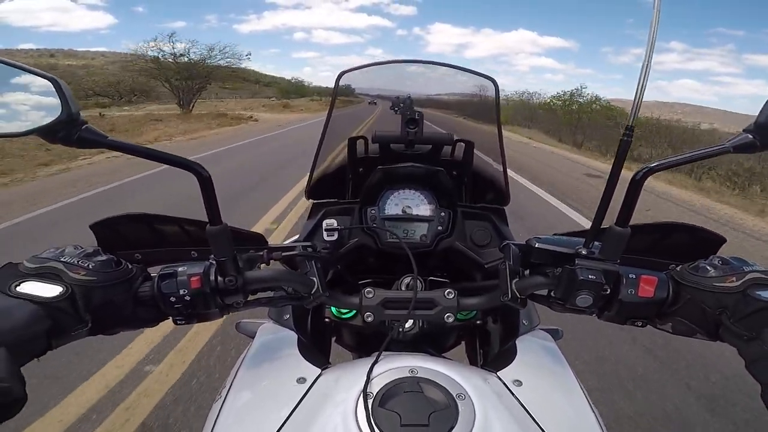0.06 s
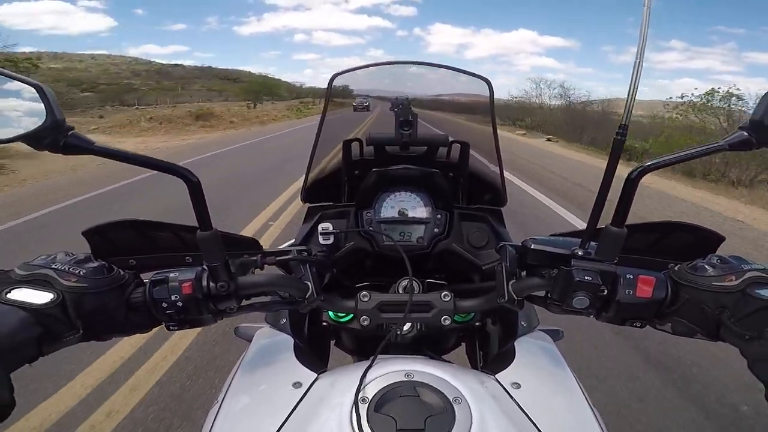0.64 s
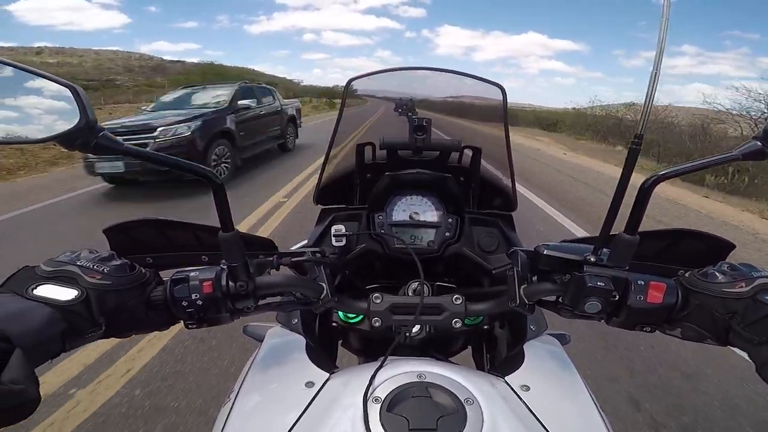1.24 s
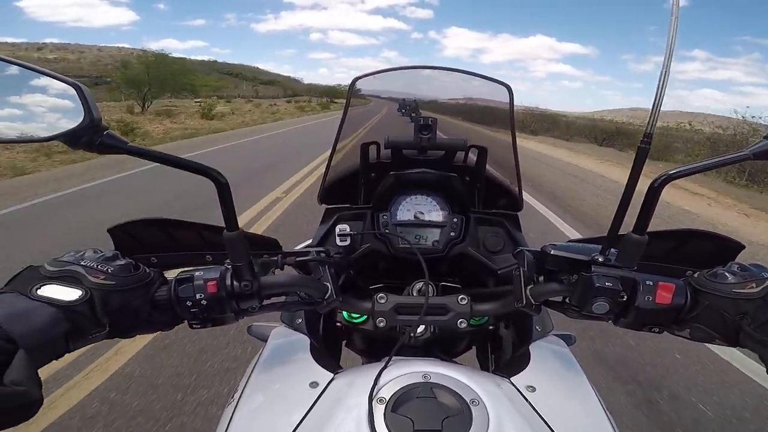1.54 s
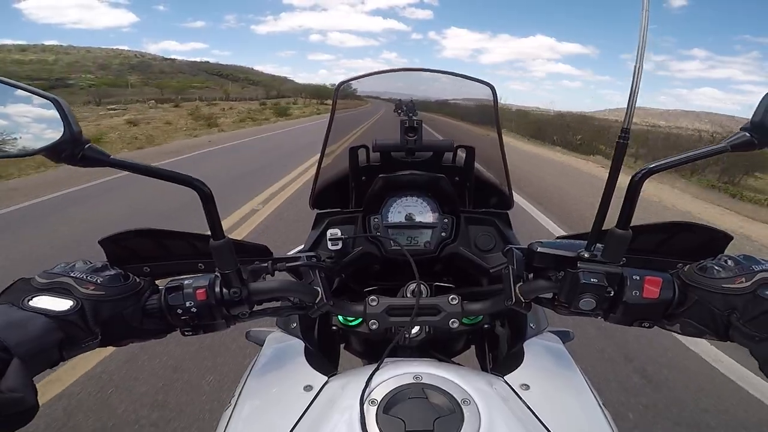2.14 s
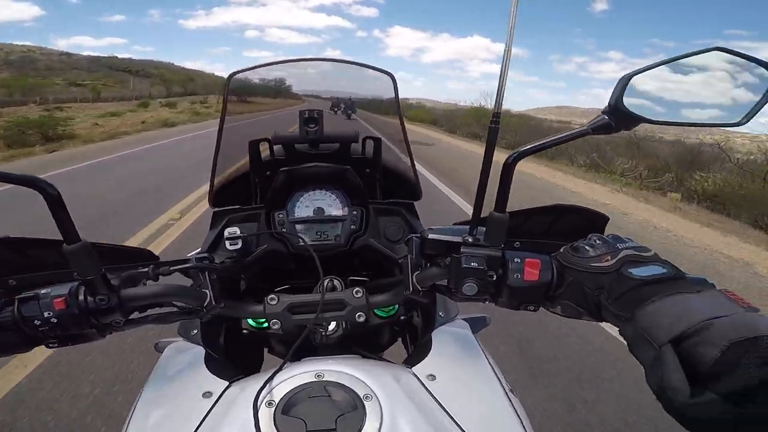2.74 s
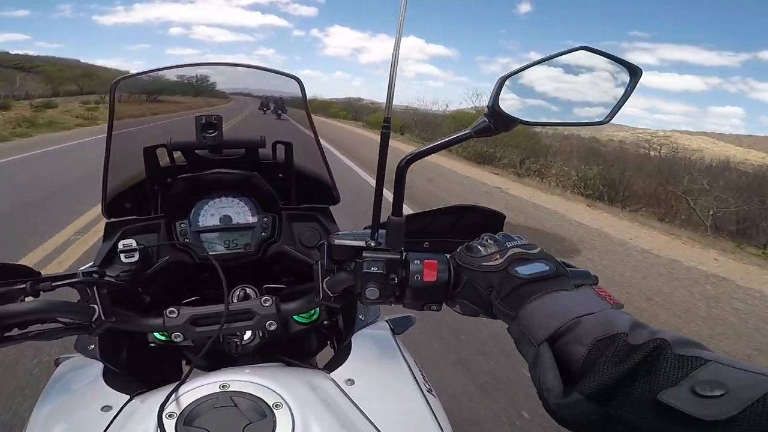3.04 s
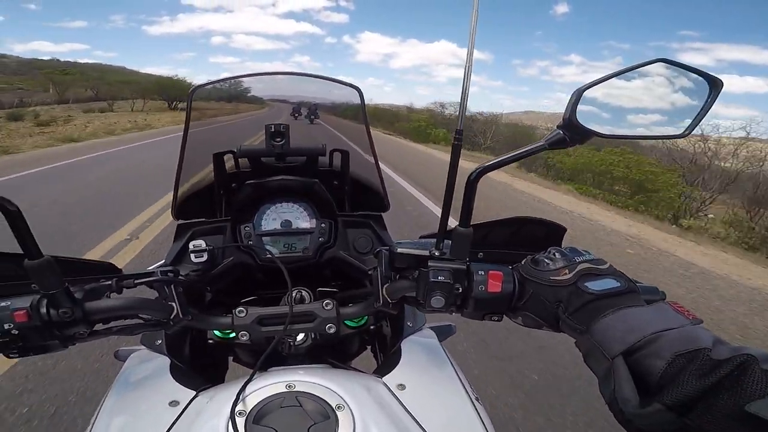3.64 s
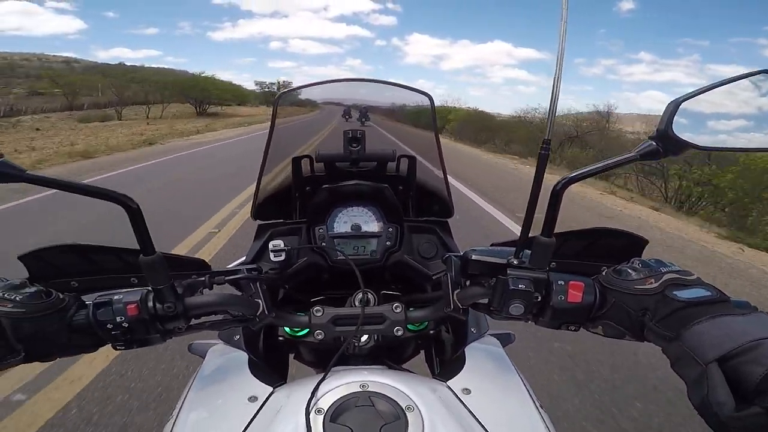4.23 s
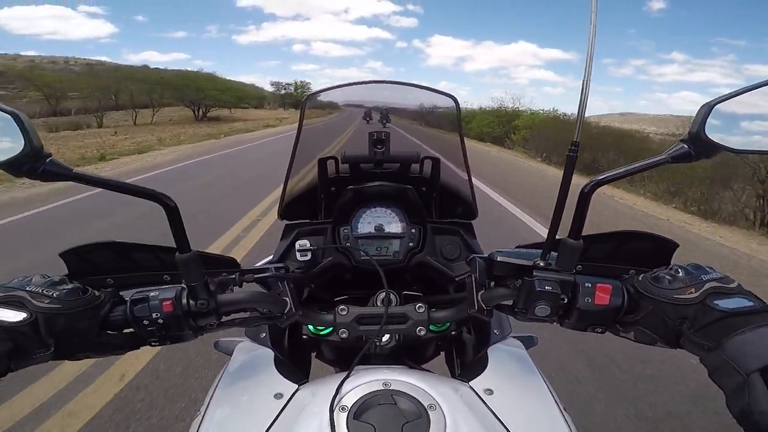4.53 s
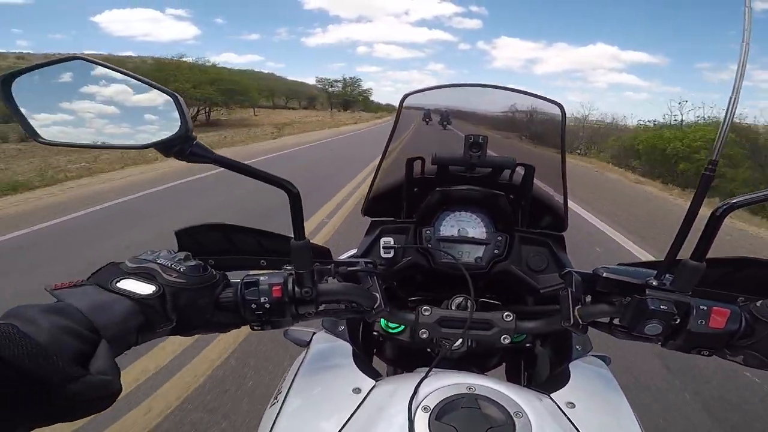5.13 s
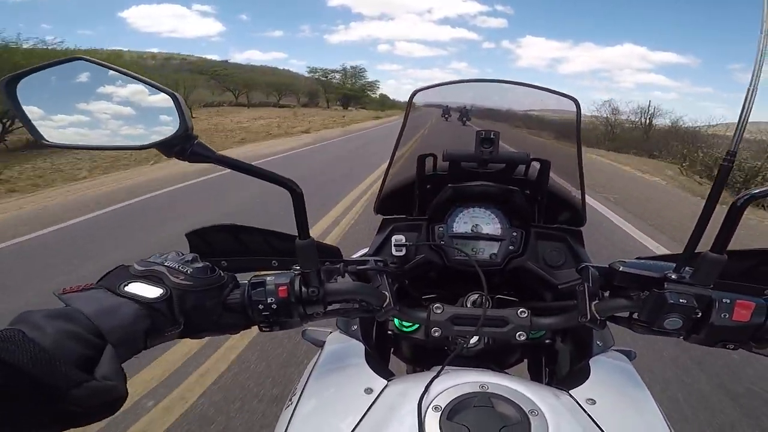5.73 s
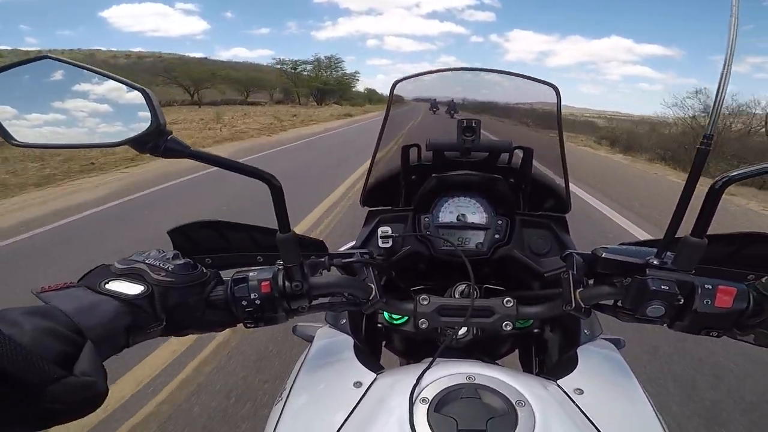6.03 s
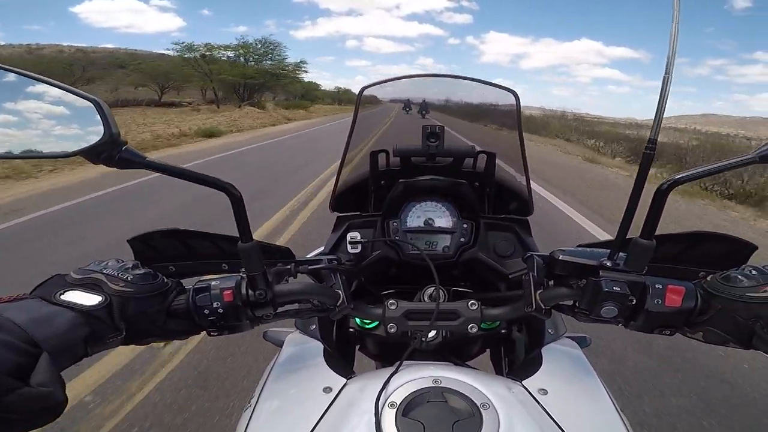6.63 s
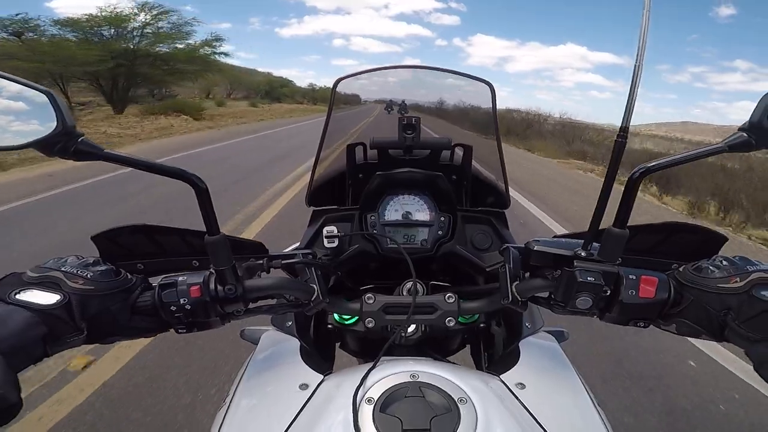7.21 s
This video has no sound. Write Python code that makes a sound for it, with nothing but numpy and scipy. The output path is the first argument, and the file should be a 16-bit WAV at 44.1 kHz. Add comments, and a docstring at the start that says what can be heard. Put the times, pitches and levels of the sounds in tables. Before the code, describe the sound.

A motorcycle rides at an even speed on an open road, heard from the rider's helmet, where low, gusty wind buffeting dominates. The engine's hum and light whine sit underneath, growing slightly stronger later. After about a second a pickup whooshes by in the opposite direction with a very short whistle. Soft thuds, sharp slaps of air and a few brief overloading pops hit the microphone along the way.

```python
"""Turbulent wind buffets a microphone on the helmet of a cruising motorcyclist: eddies roar, hiss, thump
and slap, and now and then a blast pins the diaphragm. Beneath it the exhaust hums, intake gulps drone
in the airbox, the gears whine, the chain rings and the valves tick. A pickup rushes past the other way
with tyre roar and a brief whistle, and the riding gear rustles a few times."""
import sys
import numpy as np
from scipy import signal
from scipy.fft import rfft, irfft
from scipy.io import wavfile
from scipy.ndimage import uniform_filter1d

SR = 44100
rng = np.random.default_rng(int(sys.argv[2]) if len(sys.argv) > 2 else 0)


def wrap_up_sound(samples):
    """Save the sound to the file named by the first command line argument, as 16-bit audio."""
    columns = np.atleast_2d(samples).T
    # keep every value between -1 and 1, then stretch to whole-number steps
    tamed = np.clip(columns, -1, 1)
    steps = np.round(tamed * 32767).astype(np.int16)
    wavfile.write(sys.argv[1], SR, steps)


N = 325017
TIME = np.arange(N) / SR
FREQS = np.maximum(np.arange(N // 2 + 1) * SR / N, 1)


# steady colour of the wind: f/Hz, relative level/dB
WIND_COLOUR = [(3, -9.5), (8, 9), (20, -0.5), (57, -5.5), (113, -13.5), (235, -13.5), (360, -23),
               (520, -25), (720, -28.5), (1000, -33.5), (1250, -35.5), (1600, -40.5), (2200, -41.5),
               (3000, -45)]
# treble let through by the microphone housing: f/Hz, gain/dB
HOUSING_EQ = [(3080, 0), (3550, -10.6), (4000, -13.3), (4700, -16), (5250, -16.6), (5750, -20),
              (6300, -25.5), (7600, -30), (9700, -32), (11700, -39.5), (13500, -52), (15500, -62)]
# slow fader rides on the wind: t/s, buffeting/dB, roar/dB, hiss/dB
WIND_RIDES = [(0.0, 2, -2.5, 3), (0.6, -3, 0, 0), (1.5, -1.5, 3, 0.5), (2.05, -0.6, -2, 0.2),
              (2.5, -2, -1.3, 0), (3.3, 1.1, -2.5, 1.5), (4.0, 0, -1.5, -0.4), (4.4, -0.5, -1, 1.1),
              (5.099, 0, -2.7, -0.5), (6.1, -0.8, 0, -1.3), (6.7, -2, -0.5, 1), (7.37, 2.5, 2, -1.5)]
# one band per eddy size: upper edge/Hz, shares of buffeting, roar, hiss, gusts and lulls,
# random gusts/dB, burst depth/dB, lift after the head turn/dB
EDDY_BANDS = [(23, 0, 0.053, 0, 0.87, .5, 0.33, 0.36, 0.12),
              (72, 0.84, 0.2, 0.01, 0.8, 1.2, 0.36, 0.1, 0.46),
              (125, .8, 0.24, 0.01, 0.45, 2.2, 0.53, 0.12, -0.42),
              (326, 0.18, 0.91, 0.29, 0.93, 1.6, 0.36, 2.64, 0.31),
              (793, 0, .15, 1, 0.26, 0.51, 0.19, 0.66, 0.28),
              (1560, 0, 0.39, 0.34, 0.47, 0.98, 0.22, 0.58, 1.6),
              (3770, 0.48, 0.03, 0.79, 0.85, 2, 0.7, 1.3, 0.15),
              (6300, 0.05, 0.18, 0.32, .15, .3, .2, 0.78, 0.36),
              (20000, 0.072, 0.054, 0.69, .2, .4, .3, 2.0, 1.8)]

def wind(db=-12.5, wander_hz=8.2):
    """Large eddies buffet, middling ones roar, small ones hiss; shared bursts shake them together."""
    times, *rides = np.transpose(WIND_RIDES)
    rides_db = np.array([np.interp(TIME, times, ride) for ride in rides])
    spectrum = colour(WIND_COLOUR) * colour(HOUSING_EQ) * (1 - lowpass(3.05))
    bursts = 0.5 * walk(40) + 0.58 * walk(91)
    shared_wander = walk(wander_hz)
    gusts, lulls = gusts_and_lulls(centres_hz=np.array(EDDY_BANDS)[:, 0] / 2)
    out, lower = 0, 0
    for band, gust, lull in zip(EDDY_BANDS, gusts, lulls):
        edge_hz, *ride_shares, gust_share, lull_share, wander_db, burst_db, turn_db = band
        upper = lowpass(edge_hz) ** 2
        band_gain = spectrum * np.sqrt(np.maximum(upper - lower, 0))
        band_level = np.sqrt(np.sum(band_gain ** 2) / np.sum(spectrum ** 2))
        slow_db = np.dot(ride_shares, rides_db) + gust_share * gust + lull_share * lull
        slow_db += wander_db * (.5 * shared_wander + walk(wander_hz)) + turn_db * head_turn()
        flicker_db = burst_db * bursts + 0.68 * walk(36)
        out += band_level * turbulence(band_gain, flicker_db, slow_db)
        lower = upper
    return out * undb(db)


def turbulence(gain, flicker_db, slow_db):
    """Noise flickers with the small eddies and is levelled, so that gusts set its slow contour."""
    air = noise(gain) * undb(flicker_db)
    running_rms = np.sqrt(uniform_filter1d(air ** 2, size=4800))
    return air / running_rms * unit(undb(slow_db))


# swells and dips of the wind, both: t/s, level change/dB, half length/s, eddy pitch/Hz
GUST_CUES = [(0.01, 7.5, 0.02, 199), (0.239, 3, .045, 201), (.5, -0.5, 0.035, 44.5), (.64, 4.5, 0.03, 50),
             (0.961, 5.5, 0.06, 2510), (1.17, 6.5, 0.022, 2490), (1.57, 4, 0.029, 148),
             (1.63, 2.5, 0.029, 54.9), (1.771, 6.5, 0.02, 2460), (1.99, 5, 0.056, 180), (2.3, 4, 0.14, 149),
             (2.764, 5, 0.019, 150), (2.879, 2, 0.047, 605), (3.164, -0.5, 0.058, 145),
             (3.32, 6.5, 0.037, 55), (3.559, 5, 0.05, 99.3), (3.66, 1, .04, 55.7),
             (4.08, 4.5, 0.024, 180.5), (4.379, 4, 0.054, 130.7), (4.59, 4, 0.013, 162),
             (4.964, 8.5, 0.04, 162), (5.285, 5.5, 0.027, 169.4), (5.74, 2, .05, 30),
             (5.95, 1, 0.035, 34.9), (6.564, 4.5, 0.034, 222), (6.69, 5.5, 0.073, 54.9),
             (6.8, 1.5, 0.03, 403), (7.022, 6.5, 0.048, 1895), (7.03, 4, .05, 79.6),
             (7.26, -0.5, 0.024, 203)]
LULL_CUES = [(0.12, -2.5, 0.033, 201), (.78, -1.5, 0.032, 902), (1.42, -2.5, 0.033, 129.7),
             (1.76, -0.5, .03, 159), (3.04, -3.5, 0.023, 199), (3.39, -4.5, 0.026, 199.5),
             (4.22, -2.5, 0.039, 102.5), (4.7, -0.5, 0.029, 45), (4.85, -4, 0.057, 180),
             (5.54, -3, 0.044, 217), (5.63, -3, 0.019, 997), (5.64, -1.5, .04, 109.5),
             (6.15, -5, .03, 60.3), (7.17, -3.5, .03, 50.7)]

def gusts_and_lulls(centres_hz, gust_octaves=1.6, lull_octaves=2.4):
    """Each gust or lull spreads around one eddy pitch; gives two sets of dB curves, one curve a band."""
    def spread(cues, octaves):
        return sum(np.outer(db * np.exp(-.5 * (np.log2(centres_hz / hz) / octaves) ** 2), swell(at, half))
                   for at, db, half, hz in cues)
    return spread(GUST_CUES, gust_octaves), spread(LULL_CUES, lull_octaves)


# large eddies hitting the helmet: t/s, level/dB, half length/s
THUMP_CUES = [(.221, -13.5, 0.014), (.508, -21, 0.0096), (.619, -23, 0.0068), (1.736, -12.5, 0.0056),
              (2.202, -19, 0.012), (3.153, -14, 0.013), (3.346, -16.5, 0.0072), (3.909, -12, 0.0064),
              (4.296, -11, 0.0089), (5.262, -15.5, 0.012), (6.679, -17, 0.0098)]
# their bass-heavy colour: f/Hz, relative level/dB
THUMP_EQ = [(20, -17.5), (50, 2.5), (110, -1), (230, -8.5), (400, -20.5), (1000, -46), (4000, -85),
            (12000, -135)]

def thumps():
    """Large eddies land on the helmet as soft, low thuds."""
    return noise_bursts(THUMP_CUES, colour(THUMP_EQ), grit_db=0.5)


# single eddies hitting the microphone: t/s, level/dB, decay/s, crack relative to body/dB
SLAP_CUES = [(.275, -19, .005, -7), (.325, -27, .006, 0), (.339, -22.5, 0.0051, 1), (0.359, -23, 0.0047, 0),
             (4.914, -23, 0.0047, -15), (5.168, -22, 0.0054, 1), (5.267, -21, .008, 0),
             (5.311, -26, .004, -1), (5.886, -23.5, 0.0044, 4.5), (6.361, -18.5, .007, 0.5),
             (6.676, -21.5, .0055, 1), (6.739, -18.5, .006, -17), (6.97, -19, 0.005, 3),
             (7.013, -21.5, .005, 3.5), (7.098, -20.5, .005, 3), (7.249, -17, 0.0048, -5)]
# their midrange colour: f/Hz, relative level/dB
SLAP_EQ = [(60, -21), (250, 3), (600, 6.5), (1200, -1.5), (2600, -21), (6000, -41)]

def slaps(attack_s=.0016, grit_db=1.2, split_hz=750):
    """Each eddy swells quickly and dies away within milliseconds; some thud, some crack."""
    body, crack = 0, 0
    for at, db, decay_s, crack_db in SLAP_CUES:
        since = np.clip(TIME - at, -.03, .1)
        envelope = undb(db) * np.exp(np.minimum(since / attack_s, -since / decay_s))
        body += envelope
        crack += undb(crack_db) * envelope
    air = gritty_noise(colour(SLAP_EQ) * colour(HOUSING_EQ), grit_db)
    low = tint(air, lowpass(split_hz) ** 2)
    return body * low + crack * (air - low)


# engine speed in four-stroke cycles: t/s, rate/Hz
CYCLE_RATE = [(0, 35.2), (1, 35.3), (2, 35.55), (3, 35.95), (4, 36.3), (5, 36.7), (6, 36.8), (7.37, 36.8)]

def engine():
    """Five layers follow the crank, wavering in the moving air; angle gains 2 pi per engine cycle."""
    cycle_hz = np.interp(TIME, *np.transpose(CYCLE_RATE)) * (1 + 0.00099 * walk(4.3))
    angle = 2 * np.pi * np.cumsum(cycle_hz) / SR
    return chain(angle) + valves(angle) + intake(angle) + exhaust_hum(angle) + gear_whine(angle)


# partials of the hum: multiples of the cycle rate
HUM_PARTIALS = [4, 5, 5.85, 8, 15]
# each partial after the head turn: level/dB
HUM_LEVELS = [-32.5, -35.5, -37, -47.5, -52.5]

def exhaust_hum(angle, before_turn_db=-2.5):
    """Exhaust and drive hum in low, wavering partials, a little weaker before the head turn."""
    out = 0
    for order, db in zip(HUM_PARTIALS, HUM_LEVELS):
        level = undb(db + before_turn_db * (1 - head_turn()) + 3.8 * walk(5.6))
        out += level * unit(np.sin(order * angle + 0.33 * walk(8.3)))
    return out


# airbox resonances: f/Hz, width/Hz, relative level/dB
AIRBOX_MODES = [(337, 72, -1.5), (497, 70, 1.5), (580, 32, -3), (698, 55, -3)]
# fader ride on the drone: t/s, level/dB
INTAKE_RIDE = [(0, -38), (2.2, -37.5), (2.85, -32), (3.5, -31), (3.95, -40), (5.5, -34), (6.15, -32),
               (7.37, -34)]

def intake(angle, decay_cycles=0.099, scatter_db=3, click=0.58):
    """Two unevenly spaced gulps a cycle ring the airbox; no two alike, they smear into a throaty drone."""
    cycles = angle / (2 * np.pi)
    gulps = sum(np.exp(-((cycles - lag) % 1) / decay_cycles) for lag in (0, 1 / 4))
    gulps *= undb(scatter_db * walk(40))
    edges = unit(np.diff(gulps, prepend=gulps[0]))
    breath = unit(gulps * rng.standard_normal(N))
    airbox = sum(undb(db) / (1 + ((FREQS - hz) / (width / 2)) ** 2) for hz, width, db in AIRBOX_MODES)
    level = undb(np.interp(TIME, *np.transpose(INTAKE_RIDE)) + walk(6.5))
    return level * unit(tint(click * edges + breath, airbox))


# gear tones: multiples of the cycle rate
GEAR_ORDERS = [13.65, 16.8, 19, 25.75, 33.6, 42, 51.5, 84.2, 102, 118.6, 139, 141, 144.8]
# swell of each tone: peak level/dB, peak t/s, half length/s
GEAR_SWELLS = [(-46, 6, 1.4), (-50.5, 3.3, 1.4), (-48, 5.1, 4.6), (-43.5, 3.33, 0.86), (-51, 3.7, 1.1),
               (-54.5, 5.3, 3.6), (-54.5, 6.5, 1.7), (-58, 2.1, 2.2), (-71, 4.2, 1.5), (-70, 5.7, 0.79),
               (-71, 5.6, 0.7), (-68.5, 3.05, 0.55), (-69.5, 6.4, 0.6)]

def gear_whine(angle, flutter_db=2.2, floor=.2):
    """Meshing gears sing; each whine swells as the rider's head turns towards it."""
    out = 0
    for order, (db, at, half) in zip(GEAR_ORDERS, GEAR_SWELLS):
        tooth_play = .008 * walk(30)  # smears the high whines most
        level = undb(db + flutter_db * walk(16)) * np.maximum(swell(at, half), floor)
        out += level * unit(np.sin(order * (angle + tooth_play)))
    return out


# ringing harmonics of the chain: multiples of the link rate
LINK_HARMONICS = [12, 13, 14, 15, 16, 17, 18, 19]
# each harmonic: level before the head turn/dB, level after/dB
LINK_LEVELS = [(-64.5, -64), (-71, -66), (-67.5, -61.5), (-70.5, -71.5), (-69.5, -67.5), (-69.5, -68.5),
               (-72.5, -76.5), (-76, -76.5)]

def chain(angle, teeth_per_cycle=8.44, smear_hz=64, sway=.005, flutter_db=1.5):
    """Links strike the sprocket; the slack smears each harmonic into a rough band and sways its pitch."""
    out, turned = 0, head_turn()
    swayed_angle = np.cumsum(np.gradient(angle) * (1 + sway * walk(3)))
    for harmonic, (before_db, after_db) in zip(LINK_HARMONICS, LINK_LEVELS):
        phase = harmonic * teeth_per_cycle * swayed_angle
        band = walk(smear_hz) * np.sin(phase) + walk(smear_hz) * np.cos(phase)
        out += band * undb(before_db + (after_db - before_db) * turned + flutter_db * walk(9.8))
    return out


# bright colour of the valve ticks: f/Hz, relative level/dB
VALVE_EQ = [(1000, -11), (2800, 8), (6000, -1), (10000, 0)]

def valves(angle, db=-58, decay_cycles=0.12, scatter_db=6.5, turn_db=3):
    """The valves give a faint dry tick every engine cycle, a little clearer after the head turn."""
    envelope = np.exp(-(angle / (2 * np.pi) % 1) / decay_cycles) * undb(scatter_db * walk(30))
    ticks = tint(envelope * rng.standard_normal(N), colour(VALVE_EQ) * colour(HOUSING_EQ))
    return unit(ticks) * undb(db + turn_db * head_turn())


# tyre roar of the pickup: f/Hz, relative level/dB
TYRE_EQ = [(20, -30), (400, -1.5), (740, 2.5), (1180, -10), (1600, -13.5), (2300, -18.5), (3200, -36.5),
           (5000, -50), (15000, -80)]

def pickup(at=1.295, closing_m_per_s=46, gap_m=3.5, db=-22.5, lead_s=0.033, split_hz=720):
    """The oncoming truck swells and fades with distance: the low rush of its front, then the tyres."""
    roar = noise(colour(TYRE_EQ)) * undb(db + 0.6 * walk(30))
    low = tint(roar, lowpass(split_hz) ** 2)
    out = 0
    for part, nearest_s in ((low, at - lead_s), (roar - low, at)):
        distance_m = np.hypot(gap_m, closing_m_per_s * (TIME - nearest_s))
        exposure = swell(nearest_s, 0.16)  # fairing and rider screen it when far ahead or behind
        out += part * gap_m / distance_m * exposure
    return out


def whistle(at=1.388, half_s=.011, hz=1170, fall_hz_per_s=4000, db=-27.5):
    """A brief falling whistle as the truck goes by."""
    pitch_hz = hz - fall_hz_per_s * (TIME - at)
    return undb(db) * swell(at, half_s) * np.sin(2 * np.pi * np.cumsum(pitch_hz) / SR)


# rustles of the riding gear: t/s, level/dB, half length/s
RUSTLE_CUES = [(0.256, -47, 0.015), (1.75, -55, .008), (1.884, -58, .02), (2.738, -49, 0.013),
               (2.754, -47, .005), (2.853, -51, 0.017), (3.502, -51, 0.0058), (3.552, -48, 0.012),
               (3.568, -53, 0.0054)]
# their crisp colour: f/Hz, relative level/dB
RUSTLE_EQ = [(1500, -6), (3000, 11.5), (5300, 4.5), (6600, -5), (10500, -15), (13500, -23), (15500, -42)]

def rustles():
    """The riding gear rustles in faint, grainy flecks of treble."""
    return noise_bursts(RUSTLE_CUES, colour(RUSTLE_EQ), grit_db=3.5)


def head_turn(at=4.3, ease_s=.3):
    """Crossfade from 0 before the rider's head turns to 1 after it."""
    return .5 + .5 * np.tanh((TIME - at) / ease_s)


def noise_bursts(cues, gain, grit_db):
    """Short swells of gritty noise from rows of t/s, level/dB, half length/s."""
    return sum(undb(db) * swell(at, half) for at, db, half in cues) * gritty_noise(gain, grit_db)


def gritty_noise(gain, grit_db):
    """Coloured noise of rms 1, roughened by a fast level flutter."""
    return unit(noise(gain) * undb(grit_db * walk(350)))


def swell(at, half):
    """A bell-shaped envelope; its half length is one standard deviation in seconds."""
    return np.exp(-.5 * np.minimum(((TIME - at) / half) ** 2, 100))


def walk(hz):
    """Random modulation of rms 1, rolling off above hz."""
    return noise(lowpass(hz, order=2))


def noise(gain):
    """Noise of rms 1, coloured by a gain at every frequency."""
    return unit(tint(rng.standard_normal(N), gain))


def tint(x, gain):
    """Filter with the given gain at every frequency."""
    return irfft(rfft(x) * gain, N)


def colour(points):
    """EQ curve: gain at every frequency from rows of f/Hz, level/dB."""
    hz, db = np.transpose(points)
    return undb(np.interp(np.log(FREQS), np.log(hz), db))


def lowpass(hz, order=4):
    """Low-pass gain at every frequency."""
    return 1 / np.sqrt(1 + (FREQS / hz) ** (2 * order))


def unit(x):
    """Scale to an rms of 1."""
    return x / np.sqrt(np.mean(x ** 2))


def undb(db):
    """Decibels to gain."""
    return 10 ** (np.asarray(db) / 20)


def scene():
    """The mono mix at the helmet, wind in front."""
    return (wind() + thumps() + slaps() + engine() + pickup() + whistle() + rustles())[None]


# pressure blasts that pin the diaphragm: t/s, half length/s
BLAST_CUES = [(.984, 0.0037), (1.125, 0.0018), (2.7838, 0.0039), (3.707, 0.0021)]

def record(dry, stop=-.62, ceiling=.95, fade_s=.004, top_hz=15700):
    """Blasts push the diaphragm to its stop, where it goes deaf; peaks are rounded and the top is cut."""
    for at, half in BLAST_CUES:
        push = swell(at, 1.56 * half)
        pushed = dry * (1 - 0.15 * push) + stop * push
        pinned = np.exp(-np.abs((TIME - at) / half) ** 10)
        dry = pushed * (1 - pinned) + stop * pinned
    rounded = dry / (1 + (np.abs(dry) / ceiling) ** 6) ** (1 / 6)
    fade_in = np.minimum(TIME / fade_s, 1)
    high_cut = signal.ellip(8, .2, 70, top_hz, fs=SR, output="sos")
    return signal.sosfilt(high_cut, rounded * fade_in)


dry = scene()
out = record(dry)
wrap_up_sound(out)
```